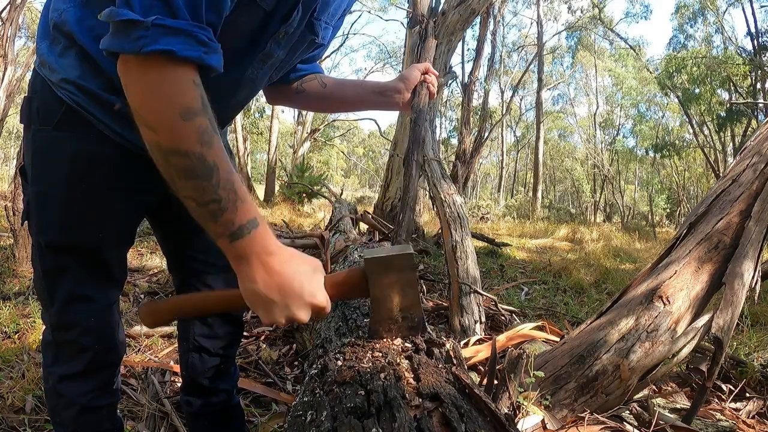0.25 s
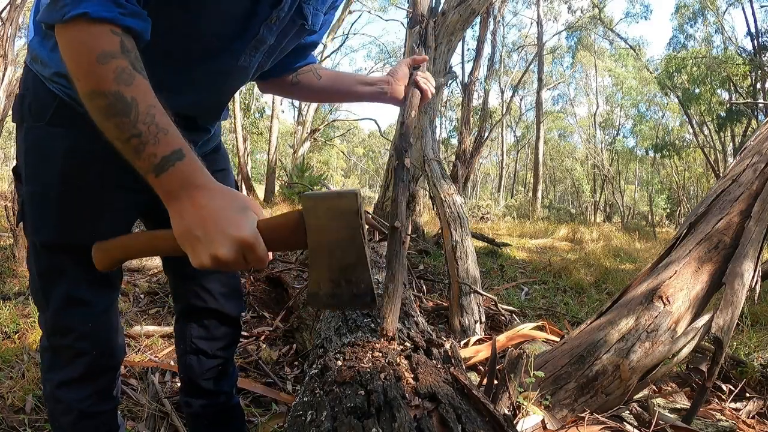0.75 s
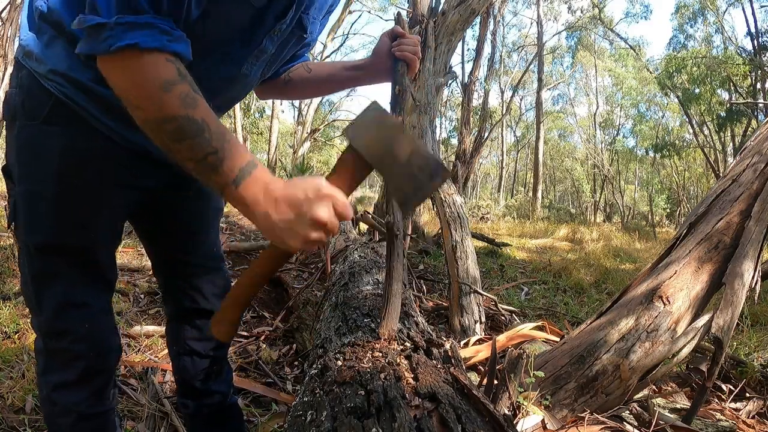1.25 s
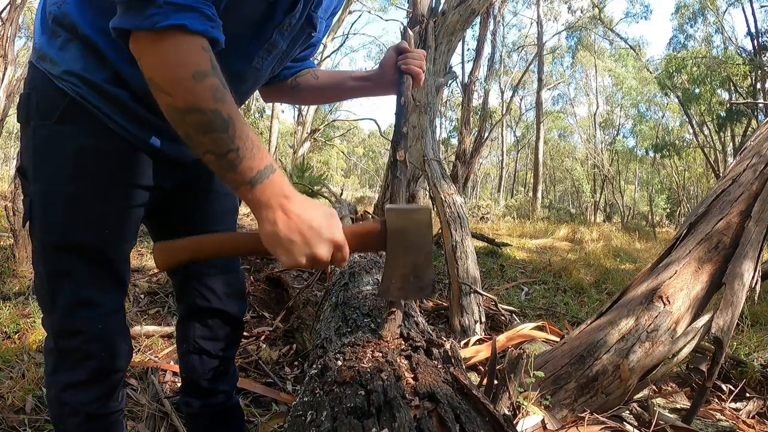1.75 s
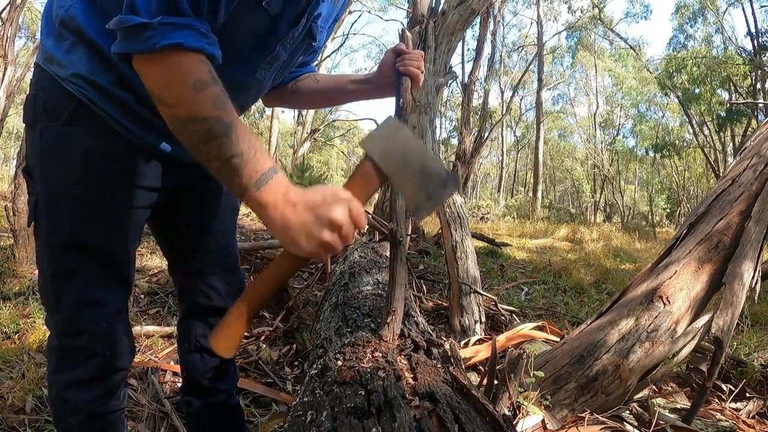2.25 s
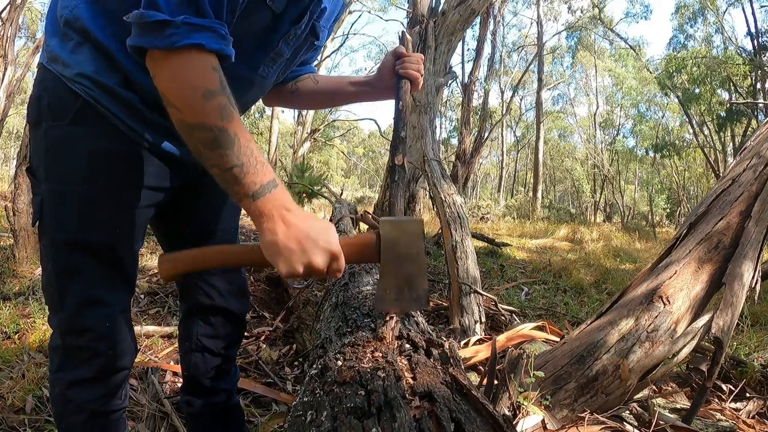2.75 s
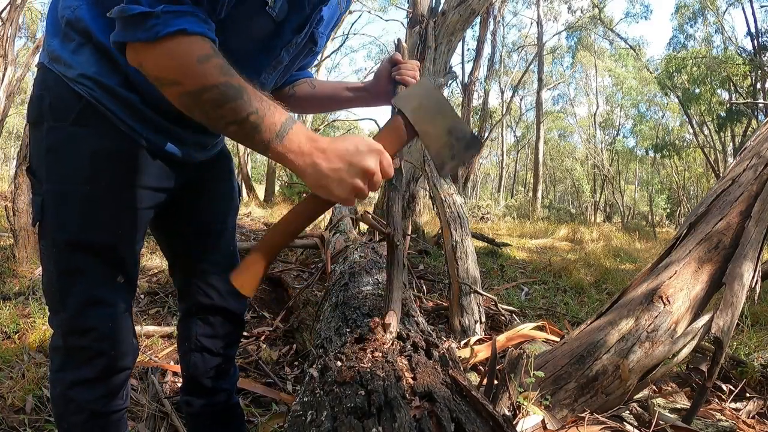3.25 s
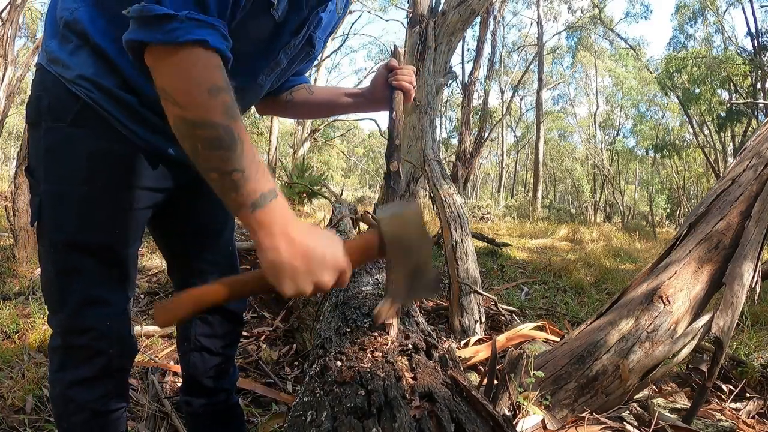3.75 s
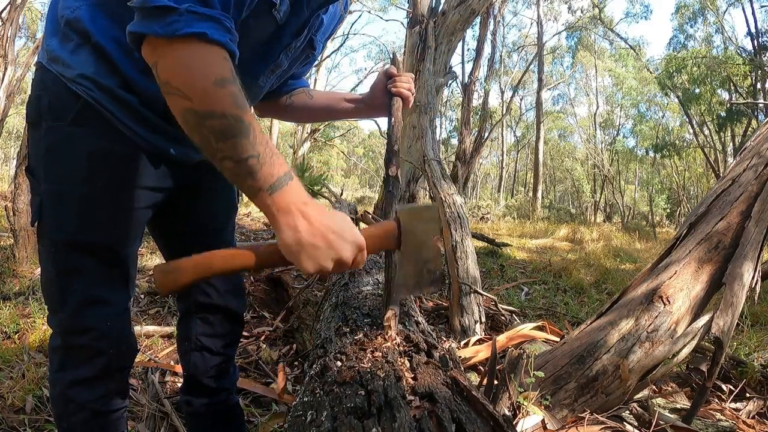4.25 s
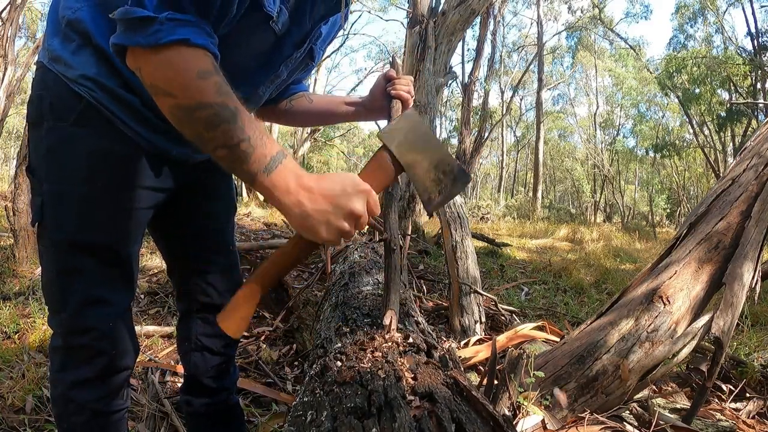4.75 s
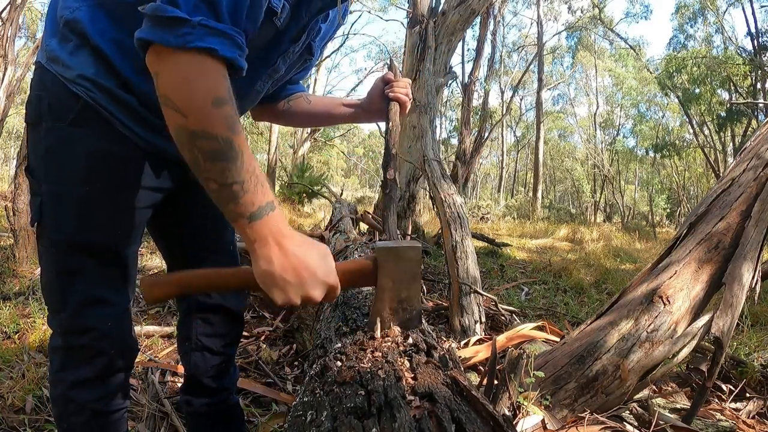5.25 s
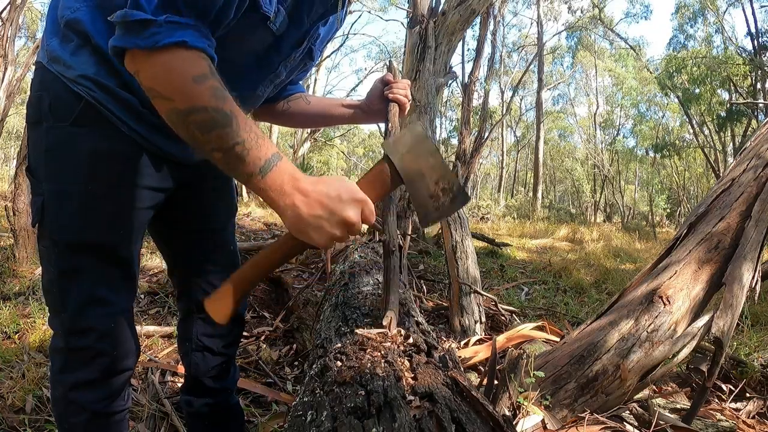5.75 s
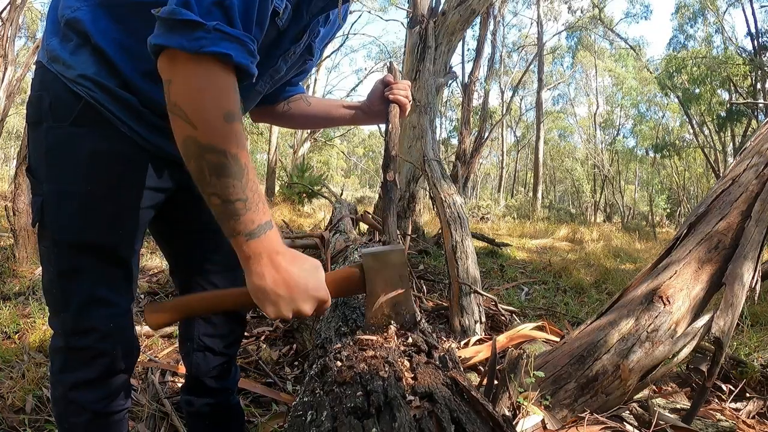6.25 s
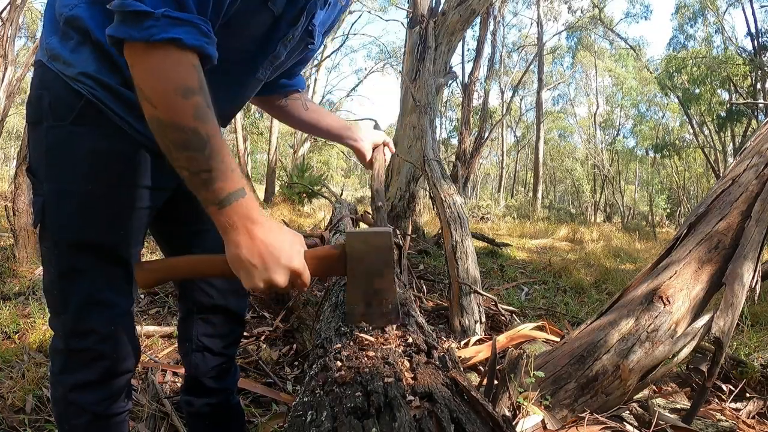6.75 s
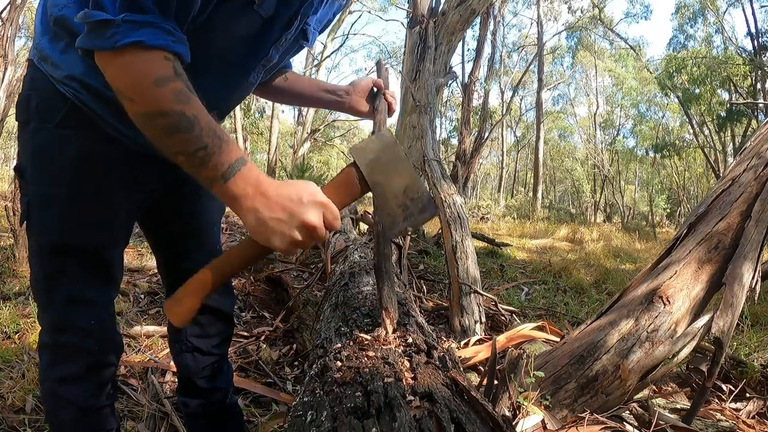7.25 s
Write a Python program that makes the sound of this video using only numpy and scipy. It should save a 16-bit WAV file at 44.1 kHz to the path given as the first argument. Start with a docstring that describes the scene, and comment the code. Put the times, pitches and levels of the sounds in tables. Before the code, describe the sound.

In still open woodland, a hatchet bites dry wood with loud, snappy, slightly uneven cracks over dull log thuds. After two opening strokes and a one-second pause with a soft scrape of wood on skin, sixteen regular blows follow. Splinters and crumbs patter lightly, thickest midway; a loose piece drops and bark shuffles near the end. The microphone is close and nearly mono, with faint air and a thin echo from the trees.

```python
"""A hatchet splits a dry stick on an old log in open woodland: eighteen strokes, each torn fibre, steel ring, thud.
Two strokes open; the stick slides in the palm, and from 1.5 s the blows fall steadily, with chips ticking throughout.
Faint hollow notes sound near 2 and 5 s; from 3.75 to 5.3 s crumbs fall thickly, and at 4 s the stance shifts.
A loose piece drops at 5.8 s, bark settles at 6.6 s, the last blow falls at 6.8 s and the stick slides again.
Noise clicks drive the wood, damped resonators the steel and log; the trees return a long, faint echo over still air."""
import sys
import numpy as np
from scipy import signal
from scipy.fft import rfft, irfft
from scipy.io import wavfile

SR = 44100
rng = np.random.default_rng(int(sys.argv[2]) if len(sys.argv) > 2 else 0)


def transcribe(u):
    """Save the signal u as a 16-bit wav file named by the first command-line argument.

    u: samples, shape (n,) or (channels, n), limited to [-1, 1]; the rate is SR.
    q: integer samples, one column per channel.
    """
    v = np.clip(np.atleast_2d(u).T, -1, 1)
    q = np.round(v * 32767).astype(np.int16)
    wavfile.write(sys.argv[1], SR, q)


N = 330309
TIME = np.arange(N) / SR


def from_db(db):
    """Logarithmic level: decibels become an amplitude ratio."""
    return 10 ** (np.asarray(db) / 20)


def rms_one(x):
    """Power normalisation: scale to rms 1."""
    return x / np.sqrt(np.mean(x ** 2) + 1e-20)


def at_level(sound, db, seconds):
    """Energy equivalence: scale a sound to the energy of db rms held for that many seconds."""
    return from_db(db) * sound * np.sqrt(seconds * SR / np.sum(sound ** 2))


def add(track, s, sound):
    """Superposition: mix a sound into a track from time s on."""
    at = max(round(s * SR), 0)
    track[at:at + len(sound)] += sound[:max(N - at, 0)]


def bump(s, db, half_s):
    """Gaussian envelope: a smooth swell and fade around time s."""
    return from_db(db) * np.exp(-((TIME - s) / half_s) ** 2)


def colour(x, points, size=4096):
    """Minimum-phase filtering: a causal filter with the given spectrum and unit power gain."""
    hz, db = np.transpose(points)
    bins_hz = np.fft.rfftfreq(size, 1 / SR)
    gain = rms_one(from_db(np.interp(np.log(bins_hz + 1), np.log(hz), db)))
    # folding the cepstrum forward in time makes the filter causal
    cepstrum = irfft(np.log(gain))
    cepstrum[1:size // 2] *= 2
    cepstrum[size // 2 + 1:] = 0
    impulse_response = irfft(np.exp(rfft(cepstrum)))
    return signal.fftconvolve(x, impulse_response)[:len(x)]


def ring(force, hz, t60):
    """Damped resonance: a unit click sets a sine of height 1 ringing, 60 dB down after t60 seconds."""
    r = from_db(-60 / (t60 * SR))
    w = 2 * np.pi * hz / SR
    return signal.lfilter([0, np.sin(w)], [1, -2 * r * np.cos(w), r * r], force + 1e-18)


def grains(count, per_s, spread_db):
    """Shot noise: random clicks of uneven size and sign; rms 1."""
    sizes = from_db(spread_db * np.minimum(rng.exponential(1, count), 4))
    signs = rng.choice([-1, 1], count)
    struck = rng.random(count) < per_s / SR
    return rms_one(sizes * signs * struck)


# spectrum of the tearing wood: pitch_hz [Hz], level_db [dB per Hz, relative]
FIBRE_SPECTRUM = [(120, -12), (300, -6.5), (550, -7.5), (720, -5.5), (950, -6.5), (1400, -0.5), (2200, 0),
                  (2900, 2), (3700, -3.5), (4600, -7.5), (6500, -18.5), (8300, -28), (11000, -27.5),
                  (15500, -55)]


def wood_spectrum(low_db, high_db, low_hz=1300, high_hz=4200):
    """Spectral tilt: the wood's spectrum with its low and high ends raised or lowered."""
    return [(hz, db + low_db / (1 + (hz / low_hz) ** 10) + high_db / (1 + (high_hz / hz) ** 10))
            for hz, db in FIBRE_SPECTRUM]


# one row a stroke; the cut lasts until the blade lands on the log:
# start_s [s], cut_s [s], level_db [dB rms], loss_along_cut_db [dB], low_band_db [dB], high_band_db [dB],
# head_ring_db [dB], thud_db [dB], thud_pitch_hz [Hz]
STROKES = [(0.1203, 0.014, -12.5, 18, -4, 2.5, -1, -16.5, 237),
           (0.423, 0.011, -10.5, 20, -2, 0.5, 7, -24, 224),
           (1.5343, 0.004, -10.5, 0, -3.5, -5, 4.5, -21.5, 160),
           (1.8813, 0.0074, -11, -8, 2, 3, 5, -31, 174), (2.2099, 0.0056, -11, 12, 5, 3, 14.5, -20, 171),
           (2.5247, 0.0043, -10, 4.5, 3, 2, 10, -22, 178), (2.8596, 0.0056, -8, 5, -3, 0.5, 2, -20.5, 268),
           (3.2322, 0.0074, -10.5, -14, -2.5, -1, -21, -16.5, 175),
           (3.608, 0.012, -12.5, -1, 2.5, 6, 5, -18, 232),
           (3.9936, 0.007, -10, -14, -1, 2.5, -11, -19, 218),
           (4.3519, 0.0081, -11.5, -3, 3.5, 1, 16, -27, 310),
           (4.7089, 0.01, -12, -6.5, -3, -1, 9, -19.5, 207),
           (5.0551, 0.0083, -12, 9.5, 2, 0.5, 13.5, -23.5, 218),
           (5.4033, 0.0063, -9, -15, -1, 7, 18.5, -19.5, 190),
           (5.7448, 0.0081, -10.5, -10, -0.5, 1.5, -46, -16.5, 206),
           (6.0853, 0.013, -12.5, 7, 3, -1.5, 15.5, -17.5, 233),
           (6.4307, 0.0086, -12, -2, 10, -3, -16.5, -14, 340),
           (6.779, 0.0085, -11, -8, 2, 2, 8.5, -20.5, 291)]
# modes of the hatchet head: pitch_hz [Hz], level_db [dB], t60_s [s]
STEEL_MODES = [(3035, 0, .033), (4545, -13, .03), (6630, -30, .02)]
# the edge scrapes the bark just before it bites: level against the cut (dB), length (s)
GRAZE_DB, GRAZE_S = -25, .009
# the dry outer shell gives way with a sharp crack: extra level (dB), delay (s), half length (s)
ENTRY_DB, ENTRY_AFTER_S, ENTRY_S = 4.5, 0.0027, .001
# the wood grips the head differently each time: spread of its pitch, as a share
HEAD_DETUNE = .01


def cuts(steel_db=-18.0, crumble_db=-28, crumble_t60=0.25, attack_s=0.0007, release_s=0.0022,
         ragged_db=4.0, mode_spread_db=3.0, clump_db=3):
    """Fracture noise and modal ringing: a graze, a ragged run of snapping fibres, splinters; the force rings the head."""
    out = np.zeros(N)
    t = TIME[:SR // 5] - GRAZE_S   # zero at the bite
    for s, length, db, loss_db, low_db, high_db, ring_db, _, _ in STROKES:
        entry_db = ENTRY_DB * np.exp(-((t - ENTRY_AFTER_S) / ENTRY_S) ** 2)
        effort_db = entry_db - loss_db * (np.clip(t / length, 0, 1) - .5)
        release = np.exp(-np.maximum(t - length, 0) / release_s)
        bite = np.clip(t / attack_s, 0, 1) * from_db(effort_db) * release
        # bundles of fibre give way one by one, 1.5 ms apart
        bundles = np.interp(t + GRAZE_S, np.arange(140) * .0015, rng.standard_normal(140))
        splinters_db = crumble_db + clump_db * (bundles - 1) - 60 * t / crumble_t60
        fringe = from_db(np.where(t < 0, GRAZE_DB, splinters_db))
        force = grains(len(t), per_s=17000, spread_db=2.5) * from_db(ragged_db * bundles) * (bite + fringe)
        crack = colour(force, wood_spectrum(low_db, high_db))
        steel = np.zeros(len(t))
        for k, (hz, mode_db, t60) in enumerate(STEEL_MODES):
            # a bright cut wakes the upper modes
            mode_level_db = mode_db + high_db * (k > 0) + mode_spread_db * rng.normal()
            mode_hz = hz * (1 + HEAD_DETUNE * rng.normal())
            steel += from_db(mode_level_db) * rms_one(ring(force, mode_hz, t60))
        stroke = rms_one(crack) + from_db(steel_db + ring_db) * rms_one(steel)
        add(out, s - GRAZE_S, at_level(stroke, db, length))
    return out


# modes of the log and ground, ringing freely: pitch_hz [Hz], level_db [dB], t60_s [s]
LOG_MODES = [(64, -10, .26), (92, -11, .18), (124, 2, .24), (143, 4, .15), (172, -3, .12), (217, -2, .19),
             (262, -3, .18), (295, -1, .13), (338, -2, .1), (420, 0, .08), (510, -5, .06), (605, -5, .06)]
# a loose piece drops on the log: start_s [s], level_db [dB], contact_pitch_hz [Hz]
DROPS = [(5.829, -35, 289)]
LOG_RING_SHARE = .45   # share of its free ringing time that the log keeps with the blade in it
# the log's after-ring: level under a 0 dB thud (dB), dB gained per dB of thud
RUMBLE_DB, RUMBLE_FOLLOWS = -25.5, 0.72


def thuds(thump_t60=0.016, rumble_s=0.18, loose_db=38, loose_t60=0.17, loose_hz=300):
    """Damped contact and modal decay: a soft push swings briefly, then the log rumbles as loose bark settles."""
    out = np.zeros(N)
    t = TIME[:SR // 2]
    landings = [(s + length, db, hz) for s, length, *_, db, hz in STROKES]
    for s, db, hz in landings + DROPS:
        push = np.sin(np.pi * np.minimum(t * hz, 1)) ** 2
        thump = ring(np.gradient(push), hz, thump_t60)   # only the change of force radiates
        knock = np.gradient(np.sin(np.pi * np.minimum(t * hz * 2, 1)) ** 2)
        loose_bark = from_db(loose_db - 60 * t / loose_t60) * rng.standard_normal(len(t))
        knock = knock / knock.max() + loose_bark
        body = np.zeros(len(t))
        for k, (mode_hz, mode_db, t60) in enumerate(LOG_MODES):
            level = from_db(mode_db + 2 * rng.normal()) * (-1) ** k
            body += level * ring(knock, mode_hz * (1 + 0.054 * rng.normal()), t60 * LOG_RING_SHARE)
        add(out, s - .0003, at_level(thump, db, .017))
        add(out, s + .004, at_level(body, RUMBLE_DB + RUMBLE_FOLLOWS * db, rumble_s))
    return out


# the loudest chips and light touches of the blade:
# start_s [s], level_db [dB], low_band_db [dB], high_band_db [dB]
CHIPS = [(0.5208, -40, -10, 6), (0.6846, -47.5, -1, 3), (0.8227, -49, -9, -8), (0.868, -47, -7, 12),
         (1.0756, -48.5, -36, 12.5), (1.1195, -47, -16, 14), (1.2384, -47.5, -42, 14),
         (1.5235, -30.5, 7.5, -10), (1.562, -29.5, 11, -4), (1.585, -33.5, 30, -7), (1.8748, -30.5, -4, -5),
         (2.23, -21, -0.5, -6), (2.5454, -25.5, 2.5, -6), (2.5883, -35, -16, 9.5), (2.8496, -33, 10, -12),
         (3.0607, -42.5, 0, 0), (3.5275, -45, -10.5, 9), (3.7344, -41, 3.5, 0), (3.8032, -50.5, -14, 21),
         (3.9341, -40, 2, 11.5), (3.9904, -27.5, -6, 5), (4.1027, -40.5, 2, -5), (4.3085, -46.5, 0, 10),
         (4.4546, -45, -6, -1), (4.483, -46, -38, 6), (4.5703, -49.5, -2, -8), (4.69, -39.5, 2, 7),
         (4.9291, -50, -8, 5), (5.182, -47, 12, 11.5), (5.2272, -46, 4.5, -18.5), (5.7615, -25.5, 3, -2),
         (5.7717, -30.5, -0.5, 12.5), (5.8262, -30.5, 11, -11), (6.4516, -25.5, 19, -2.5),
         (6.5343, -50, -17, -14), (7.0268, -47.5, 0, -16), (7.3025, -32.5, 1.5, 17.5)]


def ticks(snap_t60=.018, snap_s=.006):
    """Impulsive excitation: each chip gives one small dry snap with a colour of its own."""
    out = np.zeros(N)
    t = TIME[:SR // 20]
    for s, db, low_db, high_db in CHIPS + crumbs():
        force = grains(len(t), per_s=13000, spread_db=3.0) * from_db(-60 * t / snap_t60)
        add(out, s, at_level(colour(force, wood_spectrum(low_db, high_db)), db, snap_s))
    return out


# spells in which crumbs fall at random: start_s [s], end_s [s], crumbs_per_s [1/s]
SHEDDING = [(3.75, 5.3, 18), (6.85, 7.05, 10)]
CRUMB_DB, CRUMB_SPREAD_DB = -49, 2.5   # crumbs of bark and wood: mean level, spread (dB)


def crumbs(tint_db=5):
    """Random arrivals: crumbs land at scattered moments within each spell; rows as for the chips."""
    rows = []
    for start, end, per_s in SHEDDING:
        for _ in range(round(per_s * (end - start))):
            level_db = CRUMB_DB + CRUMB_SPREAD_DB * rng.normal()
            low_db, high_db = tint_db * rng.normal(), tint_db * rng.normal(.5)   # brighter on average
            rows.append((rng.uniform(start, end), level_db, low_db, high_db))
    return rows


# spectrum of wood on skin: pitch_hz [Hz], level_db [dB per Hz, relative]
PALM_SPECTRUM = [(200, -24), (1500, -14), (3600, -5.5), (4800, -2.5), (5600, -10.5), (7000, -21.5),
                 (14000, -43.5)]
# the stick slides through the palm as the grip changes: middle_s [s], level_db [dB], half_length_s [s]
SLIDES = [(1.006, -49, 0.078), (2.055, -56.5, 0.14), (7.338, -54, 0.06)]
# a shift of stance in the litter: middle_s [s], level_db [dB], half_length_s [s]
STANCE_SHIFT = (4.015, -50, 0.071)
# sleeves and litter: level added at each stroke (dB), fading time (s), level between (dB)
STIR_DB, STIR_DIES_S, STIR_REST_DB = -55.5, 0.083, -62


def handling():
    """Friction noise: dry wood hisses through the palm; cloth and litter crackle faintly after each stroke."""
    slide = colour(grains(N, per_s=35000, spread_db=-1.5), PALM_SPECTRUM)
    slide = slide * sum(bump(*row) for row in SLIDES)
    rustle = colour(grains(N, per_s=1200, spread_db=1.9), wood_spectrum(low_db=2.5, high_db=2.5))
    stirred = sum((TIME > s) * np.exp(-abs(TIME - s) / STIR_DIES_S) for s, *_ in STROKES)
    rustle_level = from_db(STIR_REST_DB) + from_db(STIR_DB) * stirred + bump(*STANCE_SHIFT)
    return slide + rustle * rustle_level


def settling(litter_db=-53, litter_s=6.58, litter_span_s=.14):
    """Filtered shot noise: loose bark on the log shifts dully after the loudest thud."""
    bark = [(150, -9.5), (350, -3.0), (550, 6), (900, -7.0), (2200, -22.5), (6000, -58.5)]   # Hz, dB per Hz
    shuffle = colour(grains(N, per_s=1500, spread_db=3.0), bark)
    return shuffle * bump(litter_s, litter_db, litter_span_s)


# spectrum of the echo from the trees: pitch_hz [Hz], level_db [dB, relative]
TRUNK_ECHO = [(60, -34.5), (200, -17.5), (450, 8), (900, 0), (3000, 2), (5000, 7), (8000, 8), (14000, 3.5)]


def woodland(x, wet_db=-29.5, forest_t60=0.99, swell_s=0.0083):
    """Multiple scattering: countless trunks return the sound, thinly at first and then as a smooth tail."""
    t = TIME[:SR]
    envelope = (1 - np.exp(-t / swell_s)) * from_db(-60 * t / forest_t60)
    scatter = grains(len(t), per_s=1900, spread_db=-9.6) * envelope
    echo = colour(scatter / np.linalg.norm(scatter), TRUNK_ECHO)
    return from_db(wet_db) * signal.fftconvolve(x, echo)[:N]


# faint hollow notes in the distance: middle_s [s]
HOLLOW_NOTES = [1.78, 1.82, 2.06, 4.895, 5.13]


def hollow_notes(note_db=-56, note_hz=580, note_t60=0.036, half_s=0.044):
    """Narrow-band resonance: noise through one resonator swells into faint hollow notes."""
    swell = sum(np.exp(-((TIME - s) / half_s) ** 2) for s in HOLLOW_NOTES)
    return from_db(note_db) * swell * rms_one(ring(rng.standard_normal(N), note_hz, note_t60))


# spectrum of the still air: pitch_hz [Hz], level_db [dB per Hz, relative]
STILL_AIR = [(25, -13.5), (65, 4.5), (100, -25), (170, -2), (300, -5), (560, 2.5), (900, -5), (1400, -2),
             (3000, -19.5), (4500, -23.5), (6500, -15.5), (9000, -26.5), (12800, -49), (13600, -42)]


def air(still_db=-63, hiss_db=-79, hiss_hz=11100):
    """Stationary noise: distant leaves, with a thin high band of recorder hiss."""
    leaves = colour(rng.standard_normal(N), STILL_AIR)
    hiss = rms_one(ring(rng.standard_normal(N), hiss_hz, t60=0.012))
    return from_db(still_db) * leaves + from_db(hiss_db) * hiss


def scene(lag_db=-22, apart_db=-77, radiation_hz=90):
    """Interaural difference: all is straight ahead, but for a tiny lag and a trace of hiss between the ears."""
    # a log radiates deep bass poorly
    radiation = signal.butter(2, radiation_hz, "high", fs=SR, output="sos")
    log = signal.sosfilt(radiation, thuds())
    work = cuts() + log + ticks() + handling() + settling()
    mid = work + woodland(work) + hollow_notes() + air()
    hiss_spectrum = [(100, 10.0), (2000, -9.5), (8000, -3.5), (11200, 1.5), (12800, 12.0), (13600, -26.5)]
    hiss = colour(rng.standard_normal(N), hiss_spectrum)
    # adding a little of the slope to one ear and taking it from the other acts as a lag
    side = from_db(lag_db) * np.gradient(mid) + from_db(apart_db) * hiss
    return mid + side * np.array([[1], [-1]])


def record(dry, dip_hz=9000, dip_q=10.8, cutoff_hz=16000):
    """Transducer response: the microphone has a treble notch, the loudest peaks are rounded, the top is cut."""
    notched = signal.lfilter(*signal.iirnotch(dip_hz, dip_q, fs=SR), dry)
    rounded = notched / (1 + notched ** 6) ** (1 / 6)
    return signal.sosfilt(signal.ellip(10, .1, 80, cutoff_hz, fs=SR, output="sos"), rounded)


dry = scene()
out = record(dry)
transcribe(out)
```